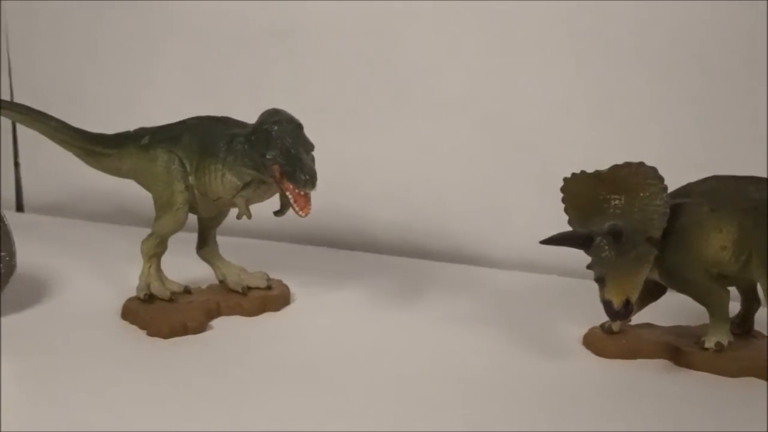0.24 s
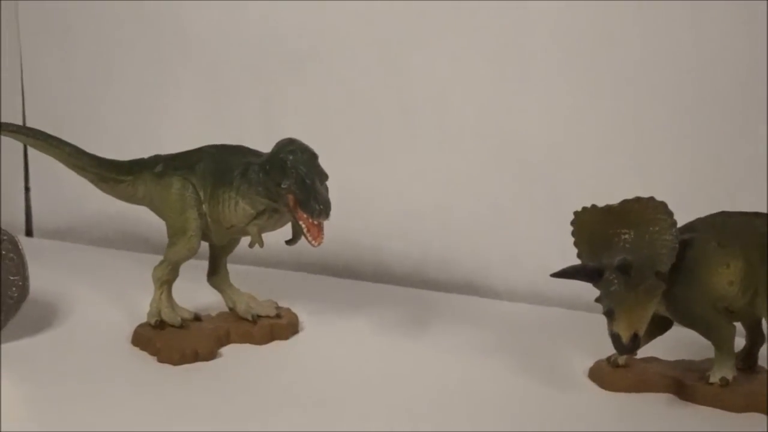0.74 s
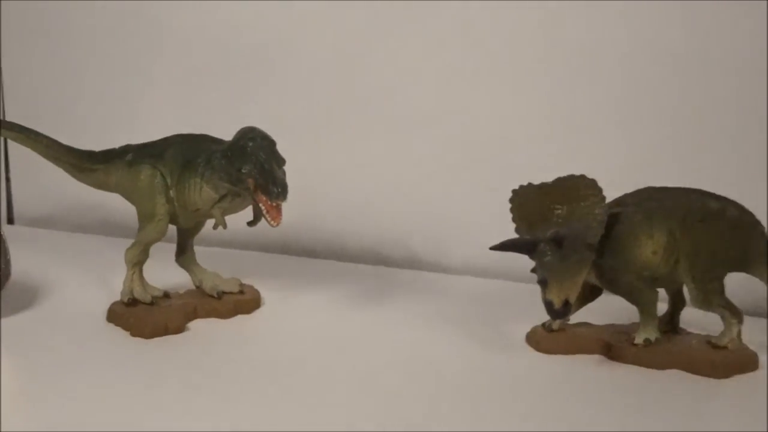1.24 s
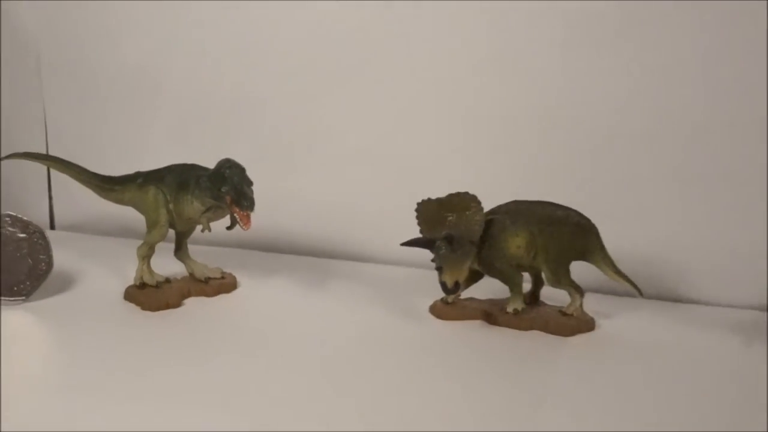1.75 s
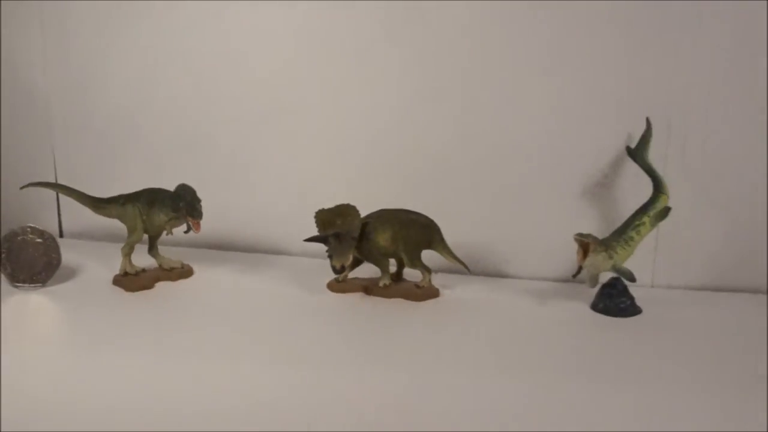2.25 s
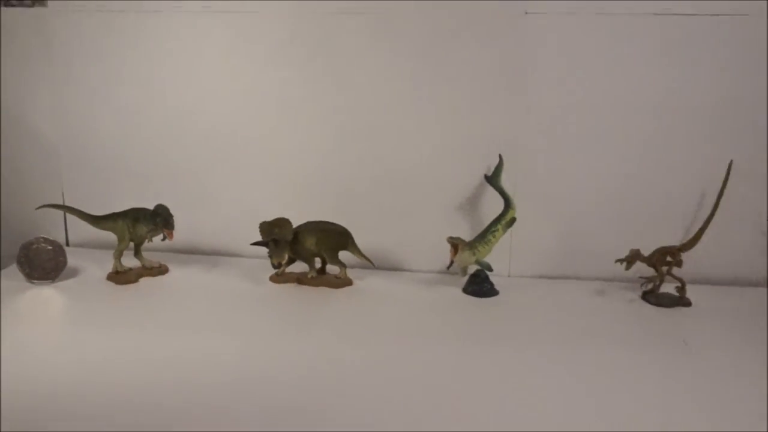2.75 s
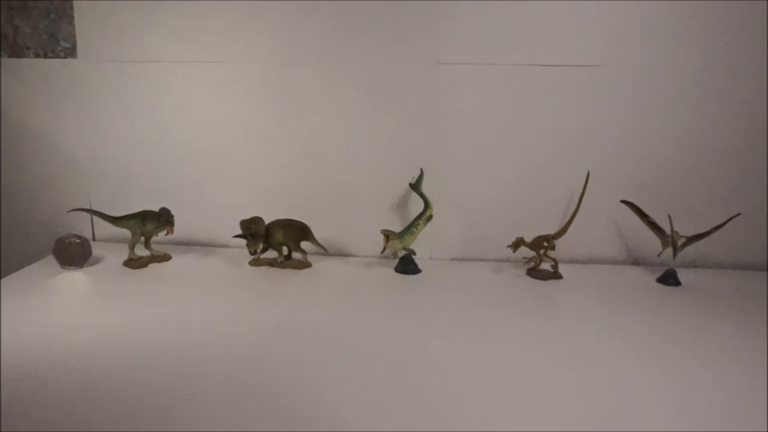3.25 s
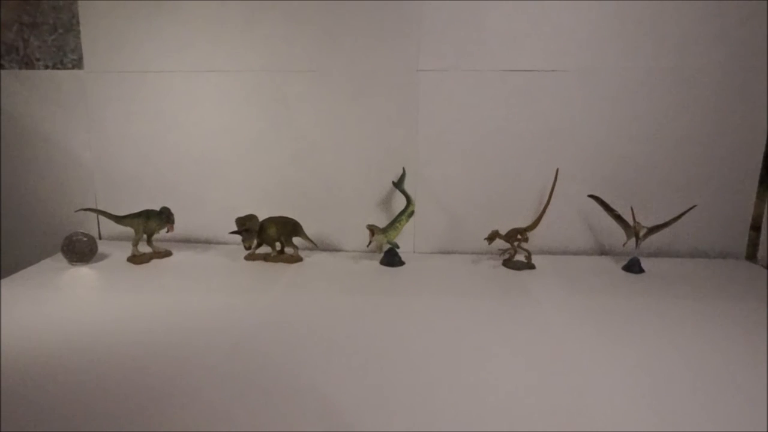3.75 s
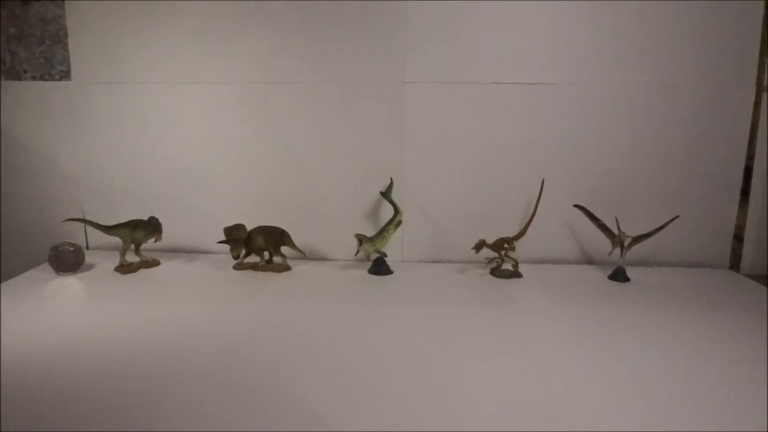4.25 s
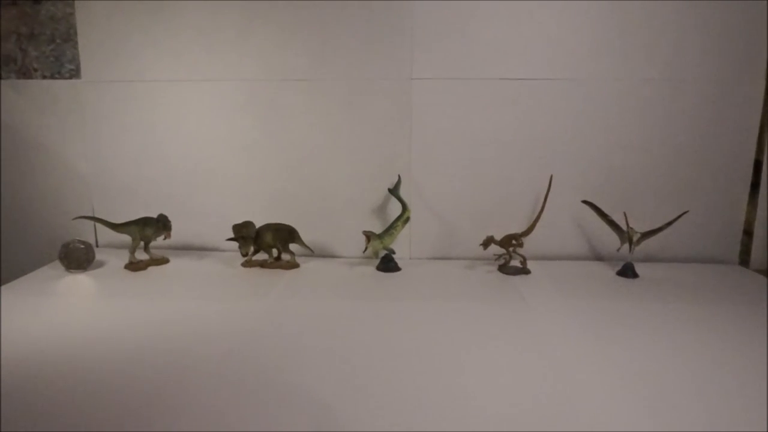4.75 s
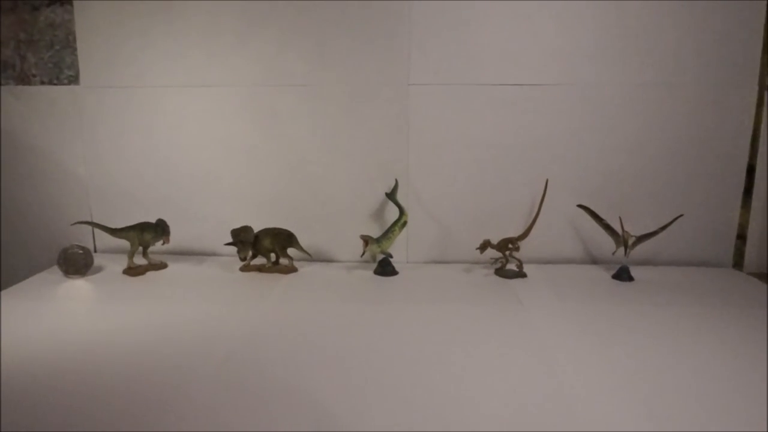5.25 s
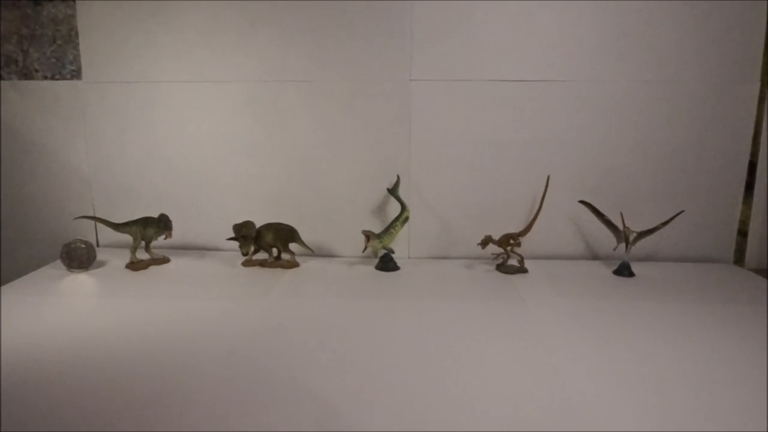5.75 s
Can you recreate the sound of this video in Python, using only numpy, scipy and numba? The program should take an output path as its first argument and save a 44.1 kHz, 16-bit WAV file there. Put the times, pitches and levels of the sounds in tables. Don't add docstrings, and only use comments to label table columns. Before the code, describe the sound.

Heard very close through a handheld camera's own stereo microphones: faint hiss and small ticks, then a clunk starts the zoom motor. Plastic gears rattle over a low barrel hum, with a bright snap early on and sizzling surges. After two seconds it ends in hard clicks and a brief coast-down, leaving very faint hiss, soft finger rubs and ticks.

```python
import sys
import numpy as np
from scipy import signal
from scipy.fft import rfft, irfft
from scipy.io import wavfile
from scipy.ndimage import uniform_filter1d
from numba import njit

SR = 44100
rng = np.random.default_rng(int(sys.argv[2]) if len(sys.argv) > 2 else 0)


def unload_audio(sound):
    columns = np.transpose(np.atleast_2d(sound))
    steps = np.round(np.clip(columns, -1, 1) * 32767)
    wavfile.write(sys.argv[1], SR, steps.astype(np.int16))


def level_to_linear(level):
    exponent = np.asarray(level, float) / 20
    return 10 ** exponent


N = 263806

# (frequency [Hz], level [dB])
HISS_SPECTRUM = [(15, -45.5), (25, 4), (59, -4.5), (204, 1), (274, 1.5), (537, 1.5), (598, 2), (1270, -2.5),
                 (1450, 0), (1900, -5.5), (3340, -9.5), (14300, -15), (15500, -24.5)]
# (frequency [Hz], likeness [-1..1])
HISS_LIKENESS = [(60, .75), (170, -0.096), (300, 0.12), (600, -0.46), (1700, -.25), (3500, 0.11),
                 (7000, -0.023), (15000, 0.15)]
# (time [s], level [dB])
GAIN_BEFORE = [(0.0, -70), (0.868, -68.5), (1.15, -65.5)]
GAIN_AFTER = [(3.45, -74), (3.69, -75), (4.52, -72), (5.61, -72), (5.79, -70.5), (5.98, -68.5)]
# (start [s], end [s], level [dB])
FINGER_SLIDES = [
    (4.293, 4.471, -59.5),
    (4.56, 4.798, -61.5),
    (4.82, 4.912, -56),
    (5.613, 5.769, -65.5),
]
# (frequency [Hz], width [Hz], level [dB])
GRIP_MODES = [(895, 770, -6.5), (1460, 360, -0.5), (2690, 1070, -1.5), (3320, 690, -1), (5000, 7500, -15)]
# (time [s], peak level [dB], frequency [Hz])
CASE_KNOCKS = [(0.078, -46.5, 377), (0.885, -42, 215), (1.035, -34, 224), (1.074, -44, 151),
               (1.134, -46, 186), (1.176, -23, 273), (1.211, -26, 786), (1.302, -24, 620),
               (3.277, -29.5, 840), (3.517, -43.5, 149), (3.587, -48, 189), (3.633, -49.5, 143),
               (3.704, -50.5, 221.7), (3.756, -49, 191), (4.102, -52, 140), (4.851, -45, 207.5),
               (4.868, -44, 211), (4.884, -50, 207), (4.961, -51.5, 290), (5.845, -44, 635)]
# (time [s], peak level [dB])
BARREL_JOLTS = [(1.357, -30), (1.453, -32), (1.501, -29.5), (1.796, -28.5), (1.826, -35), (1.875, -35),
                (1.981, -29.5), (2.085, -28.5), (2.223, -26.5), (2.683, -31.5), (2.919, -27.5),
                (3.015, -32.5)]
# (time [s], peak level [dB], hardness [0 dull - 2 bright], t60 [s])
CATCH_SNAPS = [(.842, -35.5, 0.48, 0.016), (0.857, -33.5, -0.73, 0.026), (0.99, -40.5, 0.43, 0.018),
               (1.125, -32, 1.03, 0.0074), (1.166, -30, -0.97, 0.054), (1.1855, -5.5, -0.82, 0.014),
               (1.192, -27, -0.55, 0.037), (1.209, -21.5, -.6, 0.042), (1.5595, 1, 1.71, 0.0085),
               (1.694, -39, -.2, 0.015), (2.982, -32, 1.05, 0.0087), (3.195, -27, 0.97, .017),
               (3.26, -36, 0.049, 0.042), (3.266, -30.5, 1.1, 0.044), (3.2715, -1, 0.99, 0.0089),
               (3.2751, -3.5, 1.03, 0.017), (3.2815, -16, 1.15, 0.011), (3.763, -51.5, 0.48, .022),
               (4.868, -44, 0.34, .012), (5.618, -39.5, 1.62, 0.014), (5.844, -33, .55, 0.025),
               (1.173, -26.5, -.3, 0.022), (1.179, -21, -.6, .02), (1.2, -30.5, -.1, .02),
               (1.296, -35, -0.59, 0.048), (1.345, -37, -0.24, .04), (1.463, -39, -0.13, 0.029)]
# (frequency [Hz], width [Hz], level [dB])
SNAP_GROUPS = [
    [(900, 900, 4), (1635, 1100, 6)],
    [(2620, 2700, -2), (3150, 600, -2), (3880, 480, -4.5)],
    [(5400, 1100, -2.5), (7960, 2340, 1), (9620, 1000, -11.5), (13210, 1800, -6)],
]
# (time [s], frequency [Hz], level [dB], t60 [s])
SPRING_RINGS = [
    (1.562, 2440, -43, .1),
    (3.279, 2428, -36, .19),
]
# (frequency [Hz], width [Hz], left level [dB], right level [dB], likeness [0-1])
CASE_MODES = [(657, 810, -18, -20, 0.1), (1150, 500, -36.5, -26, 0.4), (1600, 660, -22, -21, .39),
              (2302, 170, -34, -24, .56), (2504, 120, -24, -25, 0.01), (2760, 380, -23.5, -28, 0),
              (3760, 383, -6.5, -11.5, 0.7), (4136, 910, -16, -17.5, 0.2), (4100, 2600, -40, -28.5, 0.3),
              (5550, 160, -27, -50, 0.5), (6180, 960, -33.5, -29, 0.02), (6785, 190, -23, -20, 0.4),
              (7403, 490, -15.5, -21, .85), (7916, 1900, -23, -23.5, 0.3), (10063, 660, -30, -27.5, .46),
              (10710, 1100, -28, -27, .41), (12644, 870, -32.5, -35, .2), (13100, 900, -35, -39, .4),
              (14000, 1700, -30.5, -36, .56), (15180, 1100, -36, -37.5, .54)]
RIGHT_LEAD = [.6, 2.2, 2., 2.6, 2.4, 2.1, 2.5, -2., 1.2, 1.4, -2.5, .8, .2, .8, -.5, 2.7, .6, .4, .3, .1]
# (time [s], resonance [Hz], pressure level [dB])
BARREL_TRAVEL = [
    (1.18, 305, -38.5),
    (1.24, 345.2, -47),
    (1.45, 352, -41),
    (1.6, 331, -49.5),
    (2.14, 351.2, -44),
    (2.52, 352, -47.5),
    (2.9, 216.7, -47.5),
    (3.08, 233, -51),
    (3.27, 246, -53.5),
]
# (time [s], level [dB])
GEAR_LOAD = [
    (1.2, -49),
    (1.44, -44.5),
    (1.56, -49),
    (1.95, -50),
    (2.3, -50),
    (2.64, -45.5),
    (2.9, -47),
    (3.1, -50.5),
    (3.26, -42.5),
]
# (centre [s], width [s], level [dB])
TIGHT_SPOTS = [
    (1.72, 0.046, 0.5),
    (2.14, .14, 5.5),
    (2.64, 0.144, 8.5),
    (3.24, 0.041, 5),
]

T = np.arange(N) / SR
HZ = np.arange(N // 2 + 1) * SR / N
SNAP_HZ = np.arange(4097) * SR / 8192
START_S, STOP_S, REST_S = 1.167, 3.288, 3.412
SHAFT_HZ, SEGMENTS = 59.2, 3
BARREL_TO_HZ, SIZZLE_FROM_HZ = 2000, 5000


def unit(x):
    return x / np.sqrt(np.mean(x ** 2))


def along(points):
    hz, value = np.transpose(points)
    return np.interp(np.log(HZ + 1), np.log(hz), value)


def mode(hz, width, at=HZ):
    return 1 / (1 + 1j * (at ** 2 - hz ** 2) / (width * at + 1)) ** 2


def walk(rate):
    hold = int(SR / rate)
    levels = np.repeat(rng.standard_normal(N // hold + 1), hold)
    slewed = uniform_filter1d(uniform_filter1d(levels, hold), hold)
    return unit(slewed[:N])


def add(out, s, x):
    i = int(s * SR)
    out[:, i:i + x.shape[-1]] += x[..., :N - i]


def swell(start_s, end_s):
    return np.sin(np.pi * np.clip((T - start_s) / (end_s - start_s), 0, 1))


@njit
def sweep(x, hz, width):
    y, band, low = np.empty(len(x)), 0., 0.
    for i in range(len(x)):
        g, k = np.tan(np.pi * hz[i] / SR), width / hz[i]
        v = (band + g * (x[i] - low)) / (1 + g * (g + k))
        band, low = 2 * v - band, low + 2 * g * v
        y[i] = k * v
    return y


def teeth(per_s, spread_db, smooth, throb, contact_s):
    turn = 2 * np.pi * SHAFT_HZ * (T + 0.00055 * walk(6))
    pulse = 1 + throb * (np.cos(turn) + .5 * np.cos(2 * turn) + 0.75 * np.cos(SEGMENTS * turn))
    size_db = np.minimum(spread_db * rng.exponential(size=N), 18)
    hit = (rng.random(N) < per_s / SR) * level_to_linear(size_db)
    scrape = signal.fftconvolve(hit, np.hanning(int(contact_s * SR)), "same")
    force = pulse * level_to_linear(0.79 * walk(25.24)) * (smooth + scrape)
    return rfft(force * rng.standard_normal((2, N)))


def case(drive, low_hz, high_hz):
    left = right = other = 0
    for k, ((hz, width, left_db, right_db, alike), lead) in enumerate(zip(CASE_MODES, RIGHT_LEAD)):
        if low_hz <= hz < high_hz:
            alike = np.clip(alike, 0, 1)
            ring = (-1) ** k * mode(hz, width)
            left = left + level_to_linear(left_db) * ring
            right = right + alike * level_to_linear(right_db) * np.exp(1j * lead) * ring
            other = other + np.sqrt(1 - alike ** 2) * level_to_linear(right_db) * ring
    return unit(irfft(np.array([left * drive[0], right * drive[0] + other * drive[1]]), N))


def hiss():
    alike = np.clip(along(HISS_LIKENESS), -1, 1)
    white = rfft(rng.standard_normal((2, N)))
    mid, side = white * level_to_linear(along(HISS_SPECTRUM)) * np.sqrt([1 + alike, 1 - alike])
    noise = unit(irfft(np.array([mid + side, mid - side]), N)) * level_to_linear(11.5 + 0.27 * walk(7.7))
    whistle = level_to_linear(np.array([[-26], [4]])) * np.sin(2 * np.pi * 15625 * T)
    ducked_db = GAIN_AFTER[0][1] - 4
    ducked = [(START_S + 0.014, ducked_db), (REST_S - .05, ducked_db)]
    gain = GAIN_BEFORE + ducked + GAIN_AFTER
    return (noise + whistle) * level_to_linear(np.interp(T, *np.transpose(gain)))


def fingers():
    pressure = sum(level_to_linear(db) * swell(a, b) ** 1.13 for a, b, db in FINGER_SLIDES)
    colour = sum((-1) ** k * level_to_linear(db) * mode(hz, width) for k, (hz, width, db) in enumerate(GRIP_MODES))
    return pressure * unit(irfft(colour * teeth(201.7, 2.6, 2.2, 0, 0.0031), N))


def knocks():
    out, t = np.zeros((2, N)), np.arange(4096) / SR
    travel_s, travel_hz, _ = np.transpose(BARREL_TRAVEL)
    blows = [(s, db, hz, 0.027) for s, db, hz in CASE_KNOCKS]
    blows += [(s, db, 1.075 * np.interp(s, travel_s, travel_hz), 0.028) for s, db in BARREL_JOLTS]
    for s, peak_db, hz, t60 in blows:
        shape = (1 - np.exp(-t / 0.0028)) * level_to_linear(peak_db + 3.0 - 60 * t / t60)
        add(out, s, shape * np.sin(2 * np.pi * hz * t + np.array([[0], [.3]])))
    return out


def snaps():
    out, t = np.zeros((2, N)), np.arange(8192) / SR
    groups = [sum(level_to_linear(db) * mode(hz, width, SNAP_HZ) for hz, width, db in group) for group in SNAP_GROUPS]
    # share of decay time, left port's lag (samples), left against right (dB)
    lengths, lags, lefts_db = (1.5, 1.1, .6), (8, 8, 6), (-6, 0, -3)
    crackles = rng.standard_normal((len(CATCH_SNAPS), 2, len(t)))
    for (s, peak_db, hard, t60), (near, far) in zip(CATCH_SNAPS, crackles):
        step = np.arange(len(groups)) - hard
        band_db = np.where(step < 0, -18.5, -10) * step ** 2
        for db, group, length, lag, left_db in zip(band_db, groups, lengths, lags, lefts_db):
            fall = -60 * t / (t60 * length)
            shape = np.minimum(t / 0.0016, 1) ** 2 * (level_to_linear(fall) + 0.007 * level_to_linear(fall / 3.1))
            left = level_to_linear(left_db) * (.8 * np.roll(near, lag) + .45 * far)
            burst = shape * np.array([left, 1.1 * near])
            level = level_to_linear(peak_db + db + 31.5 - 16.57 * length)
            add(out, s - .0003, level * irfft(rfft(burst) * group))
    for s, hz, db, t60 in SPRING_RINGS:
        add(out, s, level_to_linear(db - 60 * t / t60) * np.sin(2 * np.pi * hz * t) * np.array([[.8], [1.1]]))
    return out


def rumble():
    shared, own = teeth(30, 3.1, 1.9, .05, 0.027) * mode(110, 200)
    return unit(irfft(np.array([shared, .85 * shared + 0.69 * own]), N))


def brushes():
    return case(teeth(260, 0.89, 2.6, 0.12, 0.0037), SIZZLE_FROM_HZ, SR)


def barrel(hum_hz, hum_db):
    sliding = teeth(40, 2.2, 1.7, 0.065, 0.015)
    ports = np.array([sliding[0], 0.84 * sliding[0] + .5 * sliding[1]])
    drive = irfft(ports * mode(328.9, 800), N)
    narrow = np.array([unit(sweep(sweep(d, hum_hz, 55.), hum_hz, 55.)) for d in drive])
    broad = np.array([unit(sweep(d, hum_hz, 300.)) for d in drive])
    wobble = level_to_linear(3.5 * walk(29.9))
    phase = 2 * np.pi * np.cumsum(hum_hz * (1 + .014 * walk(30))) / SR
    shudder = wobble * np.sin(phase + np.array([[0], [.8]]))
    steady = np.clip((2.97 - T) / 0.045, 0, 1)
    hum = steady * (0.41 * narrow + 0.8 * shudder) + 1.156 * broad
    return hum * level_to_linear(hum_db - 3.0) + case(sliding, 0, BARREL_TO_HZ) * level_to_linear(0.61 * hum_db - 23.5)


def gears():
    return case(teeth(150, 3.2, 2.04, 0.1, 0.0064), BARREL_TO_HZ, SIZZLE_FROM_HZ)


def motor():
    s, hz, db = np.transpose(BARREL_TRAVEL)
    hum_hz, hum_db = np.interp(T, s, hz), np.interp(T, s, db)
    load_db = np.interp(T, *np.transpose(GEAR_LOAD))
    coasting = uniform_filter1d(1. * (T > STOP_S), size=300)

    spin_up_db = -11 * np.exp(-np.maximum(T - START_S, 0) / 0.049)
    gear_db = load_db + spin_up_db - 12 * coasting

    tight_db = sum(up_db * np.exp(-((T - at) / wide) ** 2) for at, wide, up_db in TIGHT_SPOTS)
    brush_db = -50.5 + .3 * (load_db - np.median(load_db)) - 4 * (T - START_S) + tight_db - 5.5 * coasting

    rumble_db = -56.5 + 0.66 * (hum_db - np.mean(db)) - 17 * swell(2.13, 3.13) ** 2
    hum_db = hum_db - 9 * coasting

    dip_db = sum(-4 * (T > at) * np.exp(-np.abs(T - at) / 0.1) for at, *_ in SPRING_RINGS)
    on = uniform_filter1d(1. * (T > START_S) * (T < REST_S), size=200) * level_to_linear(dip_db)
    rattle = gears() * level_to_linear(gear_db + 7.5)
    sizzle = brushes() * level_to_linear(brush_db + 5.0)
    return on * (rattle + sizzle + barrel(hum_hz, hum_db) + rumble() * level_to_linear(rumble_db))


def scene():
    return hiss() + fingers() + knocks() + snaps() + motor()


def band_limit(x):
    return signal.sosfilt(signal.butter(12, 15820, fs=SR, output="sos"), x)


def record(dry):
    capsule = signal.butter(2, 30, "highpass", fs=SR, output="sos")
    converter = signal.ellip(10, .2, 60, 15720, fs=SR, output="sos")
    heard = signal.sosfilt(capsule, dry)
    heard = signal.sosfilt(converter, np.clip(heard, -1, 1))
    return band_limit(heard)


dry = scene()
out = record(dry)
unload_audio(out)
```